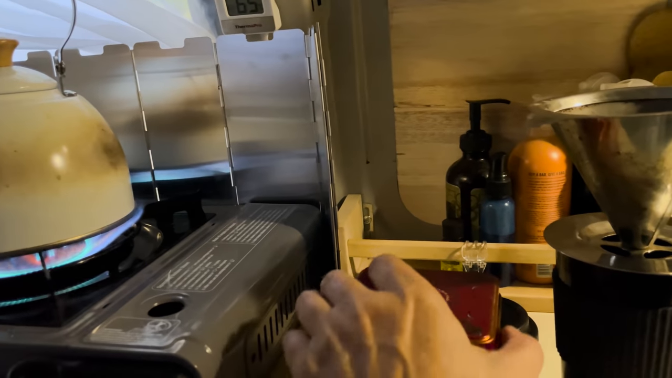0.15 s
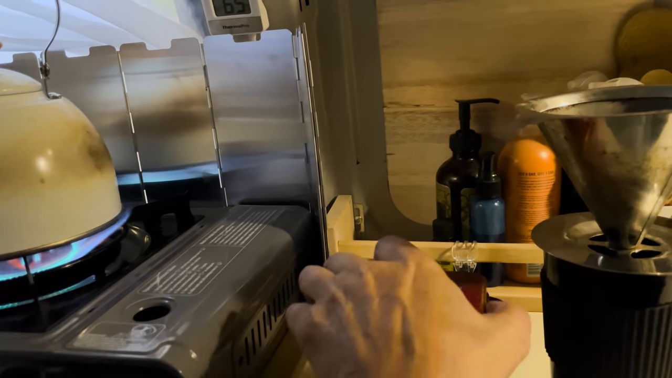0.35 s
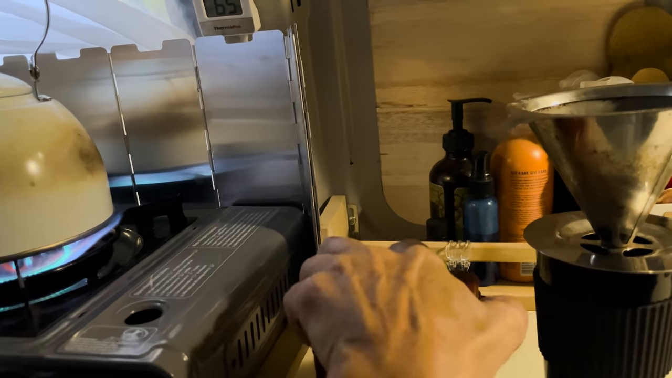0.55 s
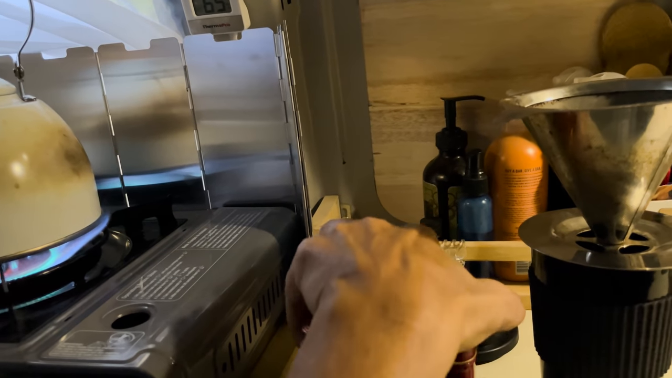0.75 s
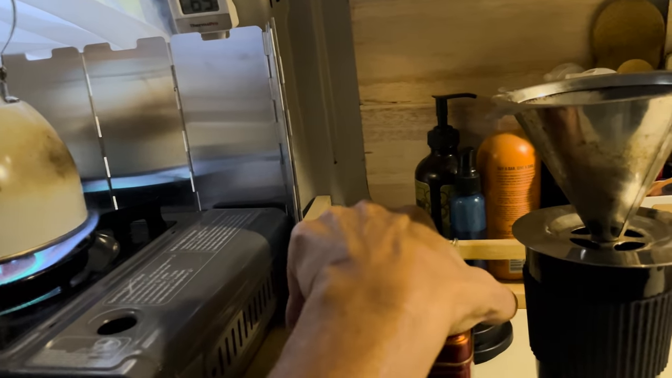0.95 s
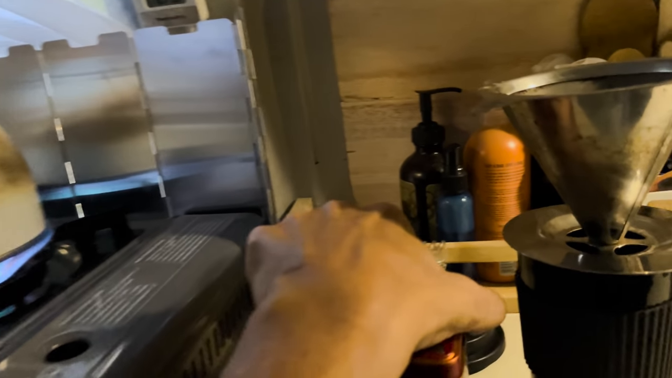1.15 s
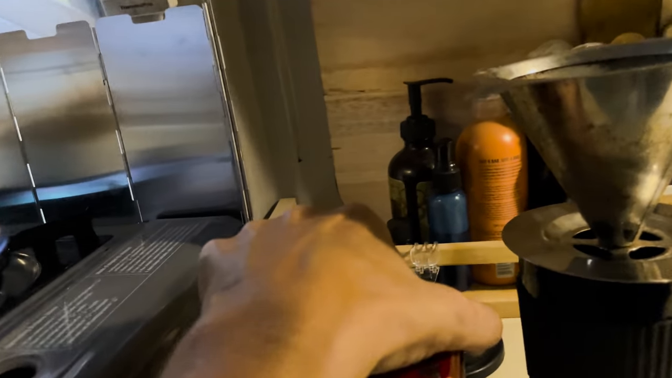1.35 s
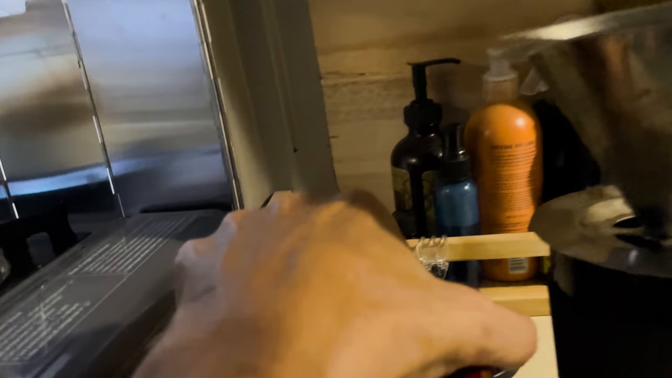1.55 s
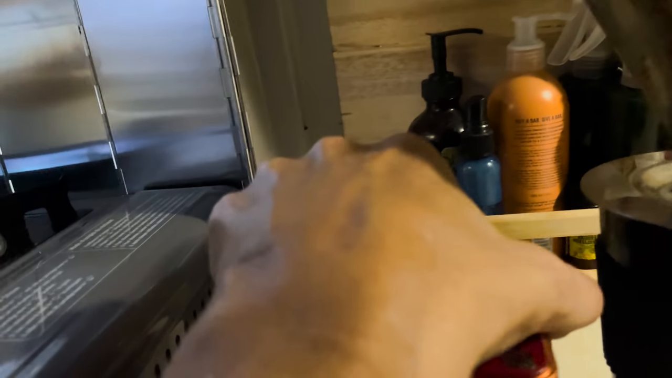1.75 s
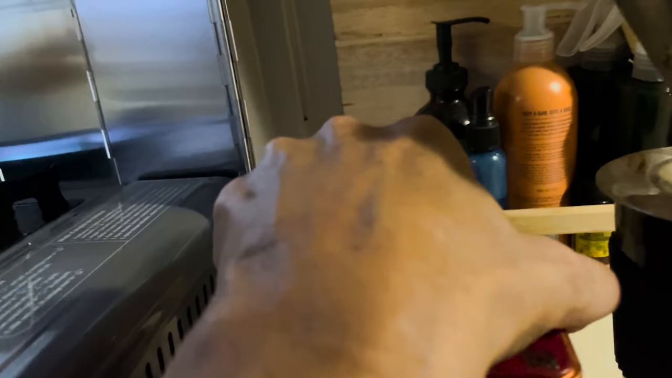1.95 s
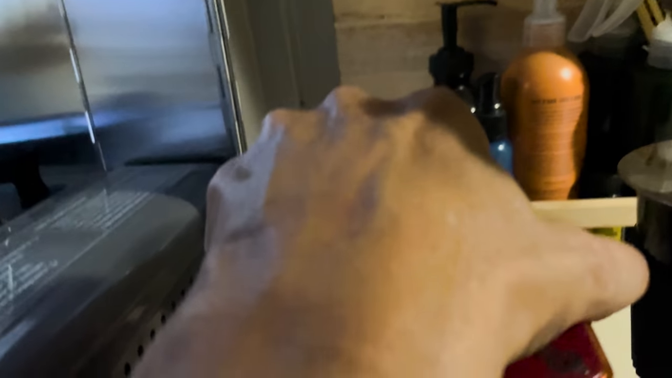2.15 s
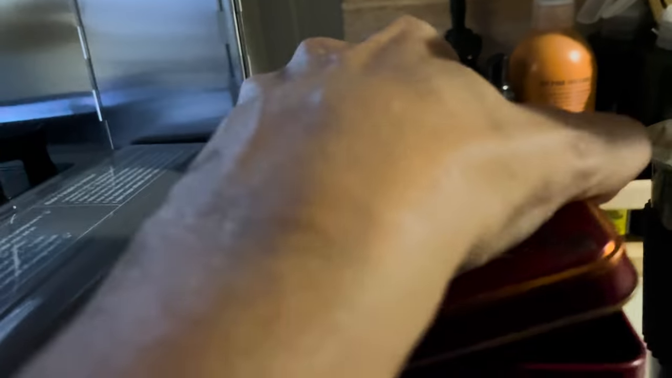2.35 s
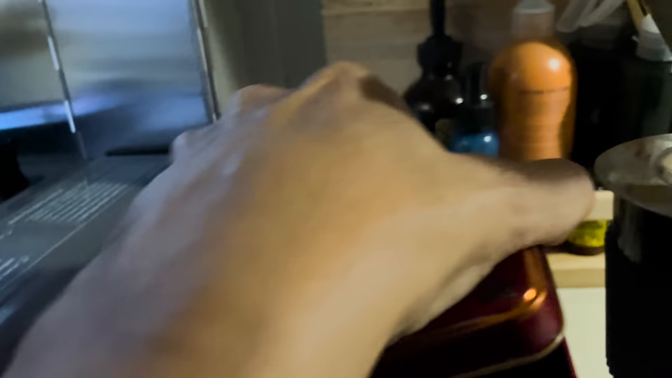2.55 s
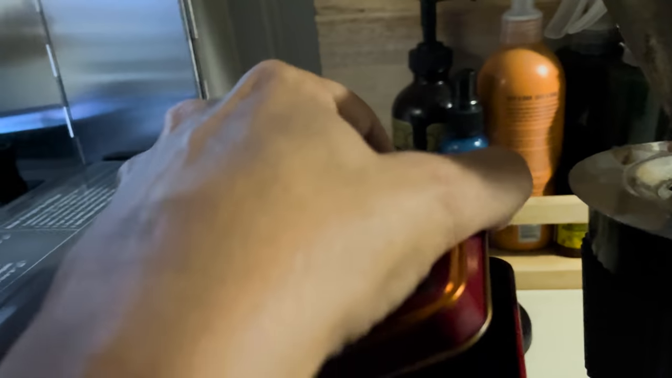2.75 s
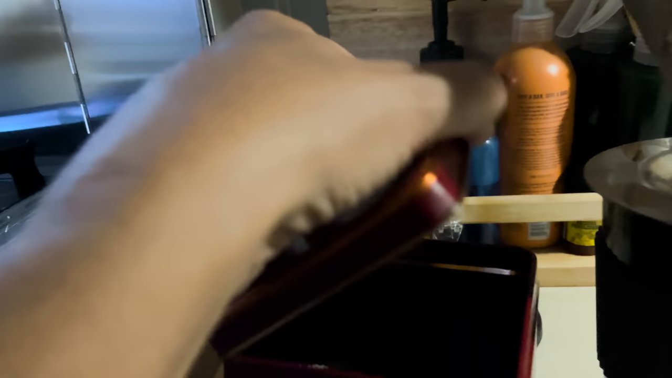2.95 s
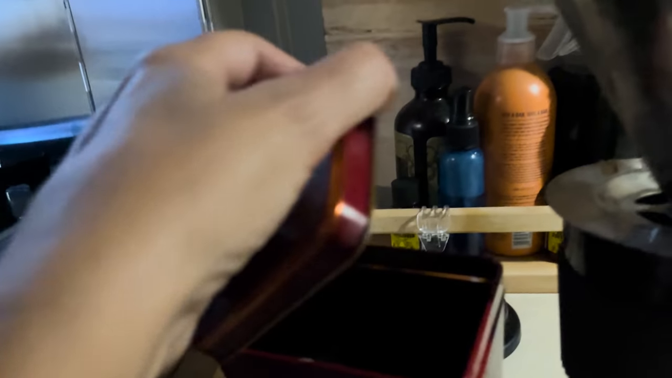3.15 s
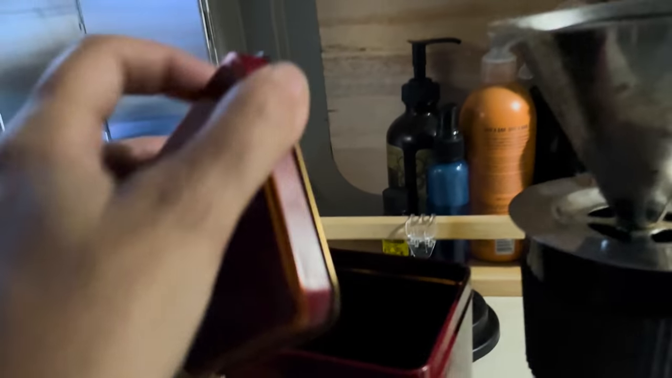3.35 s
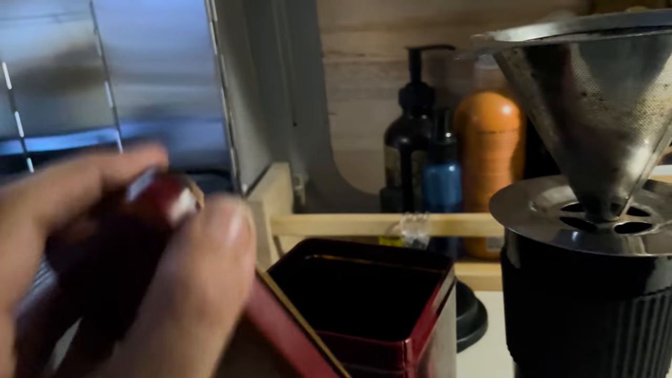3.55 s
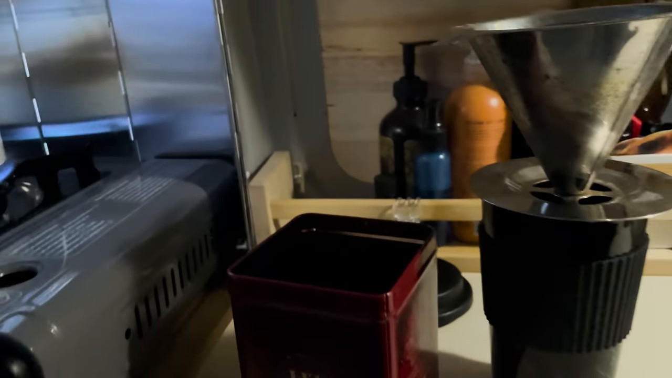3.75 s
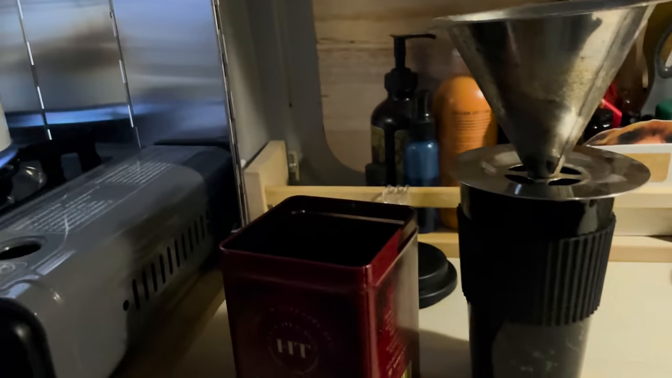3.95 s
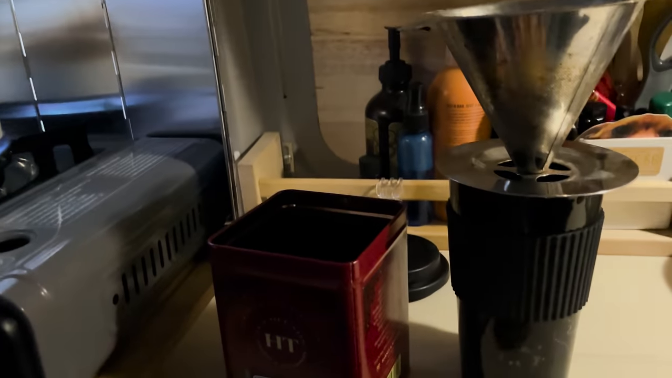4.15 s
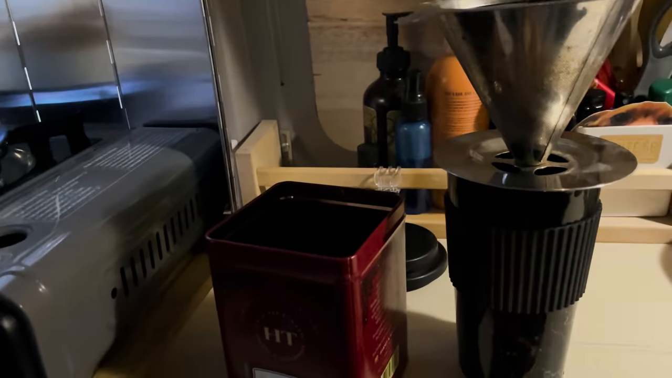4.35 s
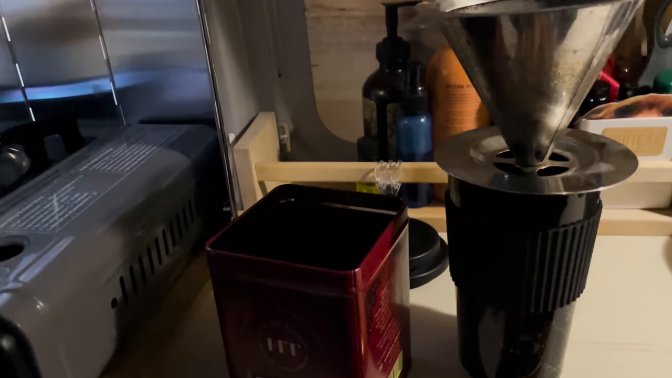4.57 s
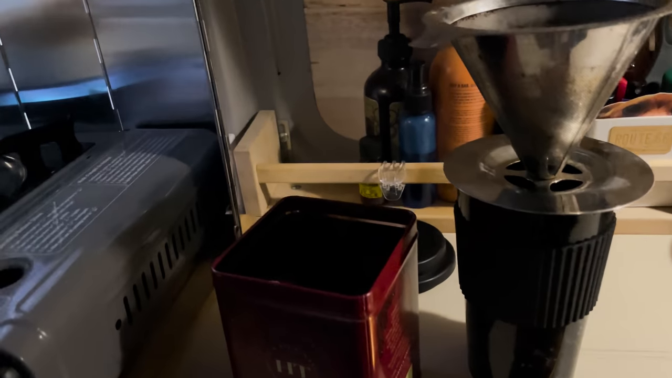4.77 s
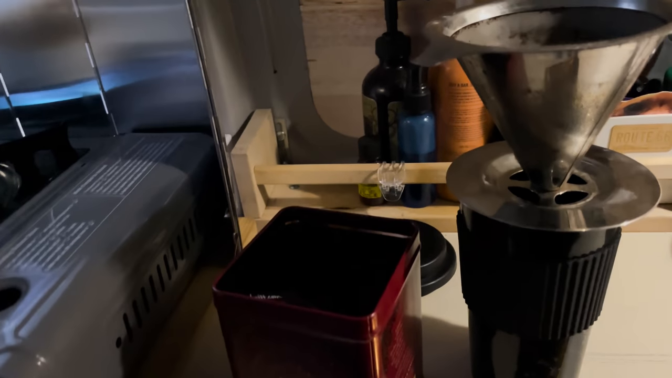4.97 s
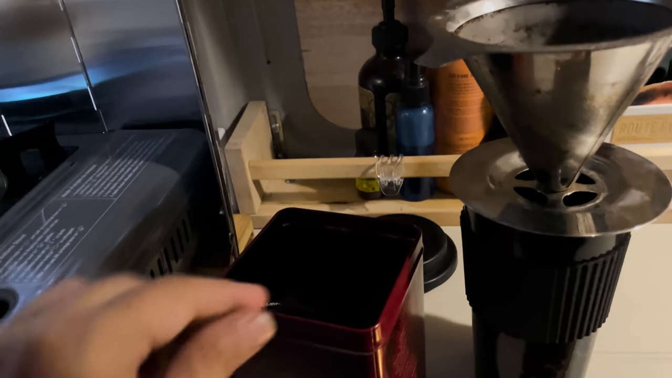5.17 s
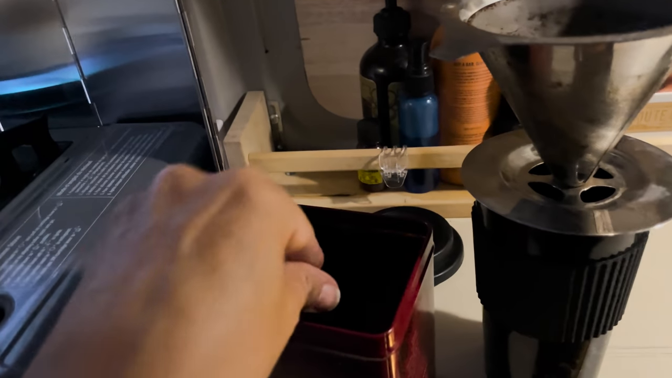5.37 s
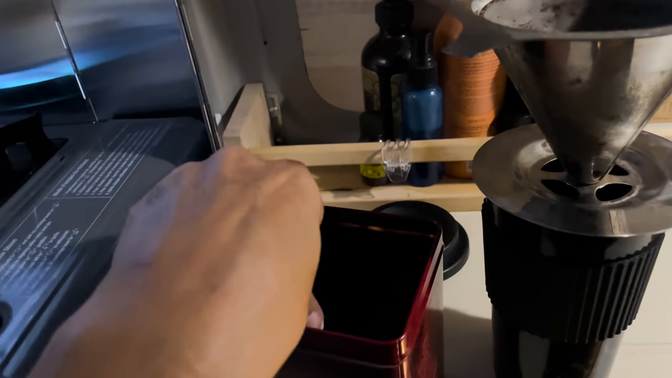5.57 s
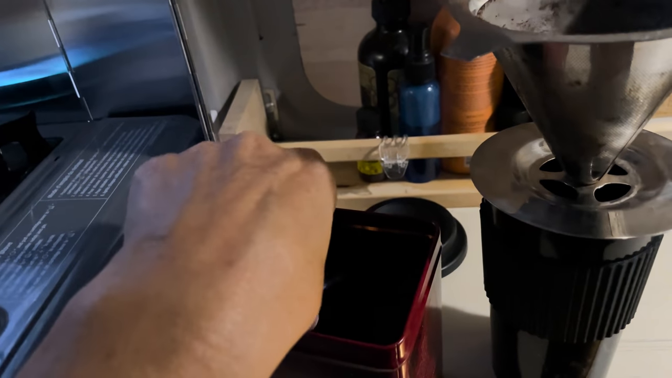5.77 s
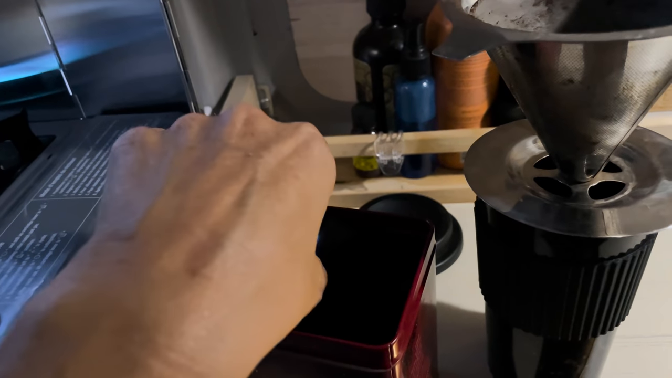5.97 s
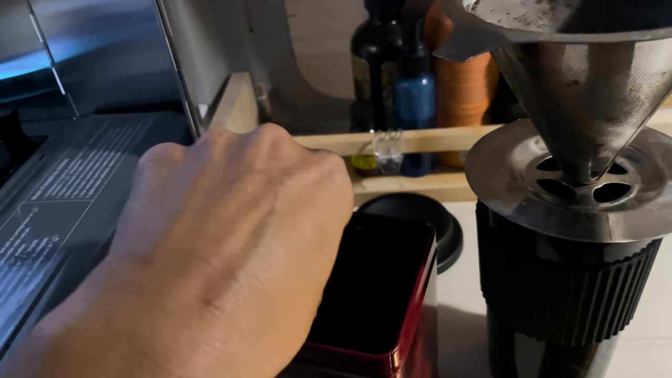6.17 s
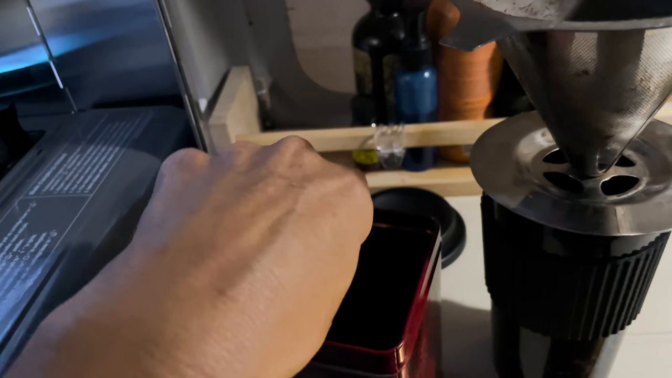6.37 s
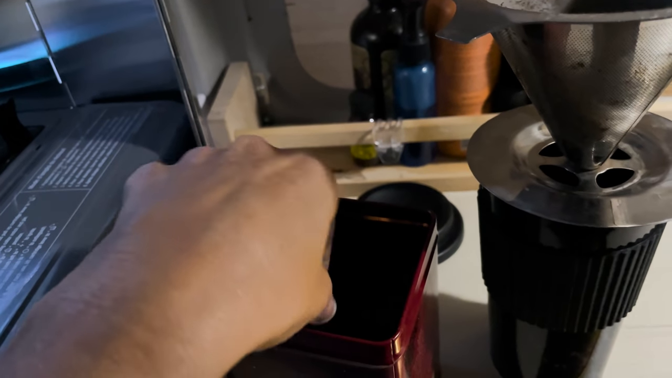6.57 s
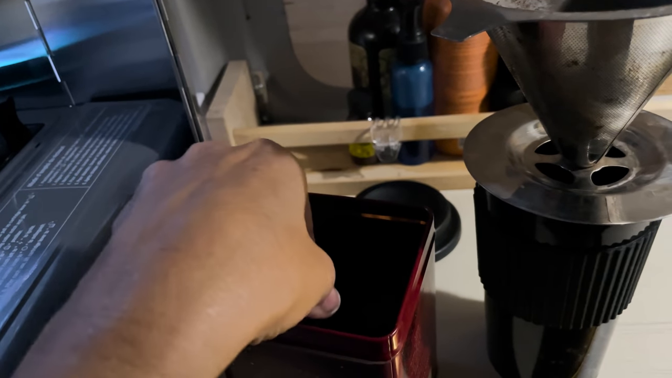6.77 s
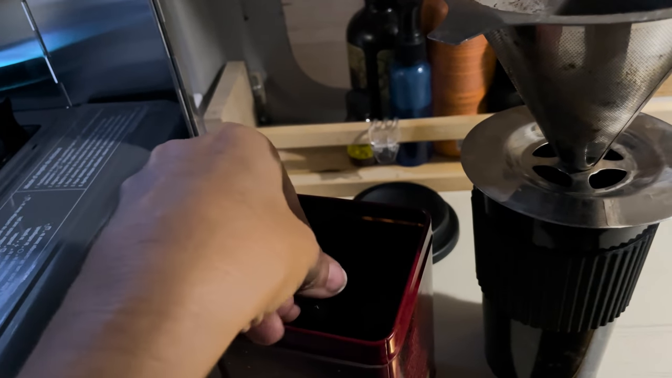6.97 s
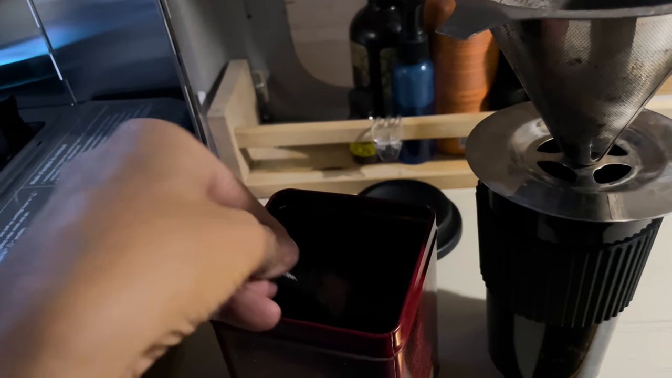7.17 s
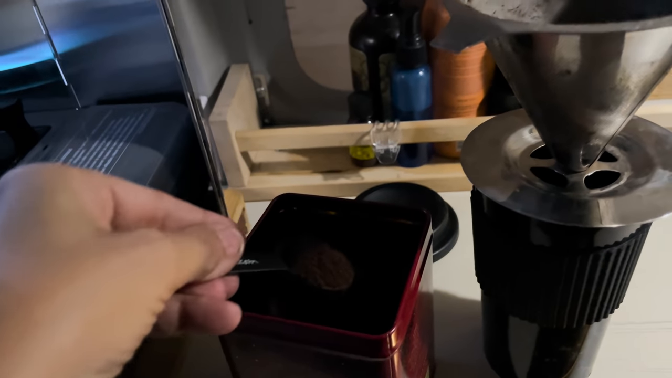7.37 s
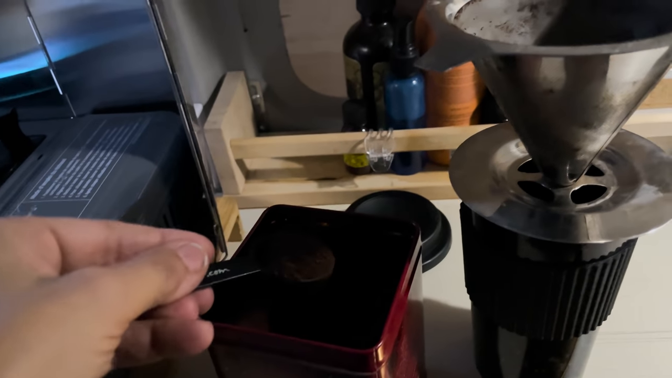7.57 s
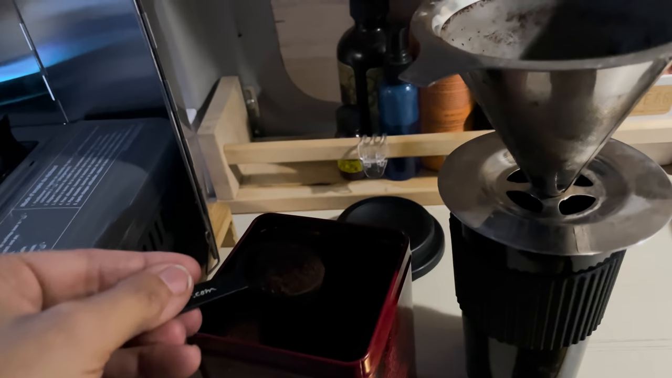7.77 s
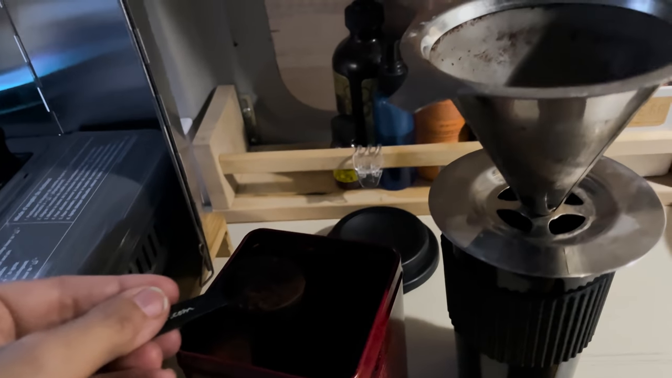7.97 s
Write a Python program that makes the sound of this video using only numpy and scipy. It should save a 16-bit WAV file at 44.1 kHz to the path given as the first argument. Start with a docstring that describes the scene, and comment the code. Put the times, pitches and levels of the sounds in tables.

```python
"""Coffee tin beside a hissing gas ring

Fingers knock and flex a sheet-metal tin, its lid pops off and is set down with a clink, then a scoop digs
in the ground coffee and taps the walls: short noisy pushes set the tin's modes ringing.
A gas ring hisses under a kettle in a small van, left of the microphones: noise shaped by resonances.
A low hum (two sines) and a rumble (low noise) lie below; a few dull echoes follow the handling."""
import sys
import numpy as np
from scipy import signal
from scipy.fft import rfft, irfft, next_fast_len
from scipy.io import wavfile

SR = 44100
rng = np.random.default_rng(int(sys.argv[2]) if len(sys.argv) > 2 else 0)


def pcm_store(signal):
    """Save signal as 16-bit PCM."""
    levels = np.round(np.clip(np.atleast_2d(signal), -1, 1) * 32767)
    wavfile.write(sys.argv[1], SR, levels.astype(np.int16).T)


N = 353461

# modes of the free tin: (frequency [Hz], relative level [dB], time to fall by 60 dB [s])
TIN_MODES = [(151.5, 10, 0.02), (162, -26, 0.045), (280, -15, 0.22), (303.4, 2, 0.14), (329, 7, 0.11),
             (385, -2.5, 0.17), (457, -0.5, 0.062), (560, 5, 0.046), (676, -3, 0.05), (751, -3.5, 0.13),
             (839, 6, 0.041), (930, -1.5, 0.036), (1106, -2, 0.013), (1080, -0.5, 0.066), (1243, -2, 0.05),
             (1520, -2, 0.059), (1632, 2.5, 0.048), (1793, 2, 0.065), (2070, -8.5, 0.06),
             (2480, 8.5, 0.048), (2930, 9.5, 0.023), (3320, 2, 0.066), (3560, -9, 0.038), (3750, -19, 0.06),
             (5020, 18, 0.004), (4770, 3, .015), (6570, 13, 0.0084), (8230, -2, 0.019)]
# middles of the mode regions, low to high: (frequency [Hz])
REGION_MIDDLES = (150, 320, 570, 850, 1500, 3200, 6500)


def from_db(db):
    """Decibels to gain."""
    return 10 ** (np.asarray(db) / 20)


def rms_one(x):
    """Scale to rms 1."""
    return x / np.sqrt(np.mean(x ** 2) + 1e-20)


def in_time(rows, **outside):
    """Columns of a curve table at every sample."""
    s, *columns = np.transpose(rows)
    return [np.interp(np.arange(N) / SR, s, column, **outside) for column in columns]


def in_hz(rows, hz):
    """Columns of a spectrum table at the given frequencies."""
    f, *columns = np.transpose(rows)
    return [np.interp(np.log(hz + 1), np.log(f), column) for column in columns]


def drift(rate_hz):
    """Slow random wander of spread 1: noise at every 40th sample through a double one-pole low-pass."""
    r = np.exp(-80 * np.pi * rate_hz / SR)
    coarse = rng.standard_normal(N // 40 + 2002)
    slow = signal.lfilter([1], [1, -2 * r, r * r], coarse)[2000:]   # the filter has settled by here
    return np.interp(np.arange(N) / 40, np.arange(len(slow)), rms_one(slow))


def cut(x, hz, kind, order=2):
    """Butterworth filter."""
    return signal.sosfilt(signal.butter(order, hz, kind, fs=SR, output="sos"), x)


def ring(push, hz, t60):
    """A mode as a resonator: a unit click sets a sine ringing from height 1, 60 dB down after t60 seconds."""
    r = from_db(-60 / (max(t60, .003) * SR))
    w = 2 * np.pi * hz / SR
    return signal.lfilter([0, np.sin(w)], [1, -2 * r * np.cos(w), r * r], push)


def sides(pan_db):
    """Left and right gains for a left-minus-right level difference."""
    return from_db(np.multiply.outer([.5, -.5], pan_db))


def placed(sound, s):
    """A short sound at its moment."""
    out = np.zeros((2, N + sound.shape[1]))
    at = round(s * SR)
    out[:, at:at + sound.shape[1]] = sound
    return out[:, :N]


def region_levels(push_db, push_hz, tap_db, soft_db):
    """A push stirs the low modes about its pitch, a tap the wall modes and, if hard, those above."""
    hz = np.array(REGION_MIDDLES)
    push_above_db, push_under_db = 8, 16   # loss per octave above and below the pitch
    off = np.log2(hz / push_hz)
    push = push_db - np.where(off > 0, push_above_db * off, -push_under_db * off)

    wall_hz, tap_under_db = 855, 12.5   # centre of the wall modes; loss per octave below it
    tap_bend_db = 1.5   # extra loss per octave squared above it
    octaves = np.log2(hz / wall_hz)
    above = -soft_db * octaves - tap_bend_db * octaves ** 2
    tap = tap_db + np.where(octaves < 0, tap_under_db * octaves, above)
    return np.hypot(from_db(push), from_db(tap))


def tin():
    """Every knock rings the same modes, weighted by where the tin is touched and damped by the grip."""
    # knocks on the tin: (start [s], push that flexes the body, level before filters and pan [dB],
    # its pitch [Hz], tap on the wall, likewise [dB], softness: loss above the wall modes [dB per octave],
    # left minus right [dB], fading time of the contact [ms])
    knocks = [(0.01, -33.5, 355, -41, 20, -2, 1.3), (0.079, -32, 300, -49, 20, -5, 2.4),
              (0.139, -36, 397, -40, 0, 0, 4), (0.194, -30.5, 300, -36, 22, -4, 2),
              (0.319, -27, 230, -32, 4, -5, 4), (0.459, -29, 340, -41, 22, -3, 1.8),
              (0.742, -35.5, 350, -33, 24, 0, 2.4), (0.858, -27.5, 320, -49, 20, -3, 0.88),
              (0.911, -27.5, 330, -28, 26, -2, 2.1), (0.988, -20, 330, -14, 10, -3, 1.86),
              (1.039, -34, 260, -50, 14, -2, 2.5), (1.069, -36, 300, -58, 0, -4, 2),
              (1.249, -27, 340, -37, 22, -1, 1.6), (1.47, -35, 320, -59, 8, -7, 1.4),
              (1.754, -30.5, 300, -47, 0, -5, 1.6), (1.839, -35, 270, -40, 12, -4, 2.6),
              (1.942, -35.5, 380, -43, 2, 1, 3.5), (2.042, -39, 420, -41, 8, 11, 3.4),
              (2.092, -43, 350, -49, 3, 3, 2.8), (2.183, -24.5, 199, -33, 5, -1, 1.9),
              (2.203, -38, 300, -43, 5, -3, 0.76), (2.306, -9, 244, -20, 4, -2.5, 2.4),
              (2.319, -13.5, 497, -31, -1.5, -1, 2.7), (2.331, -36, 190, -35, 0, 1, 1.8),
              (2.407, -24, 380, -16, 11, -3.5, 2.4), (2.456, -22.5, 540, -19, 12, 4, 1.54),
              (2.619, -27, 480, -33, 11, 1, 1.25), (2.763, -22, 370, -12.5, 4, -1, 1.74),
              (2.87, -16.5, 352, -11.5, 3, 3, 1.6), (2.931, -21.5, 428, -31, 12, 0, 1.9),
              (3.213, -34, 220, -34.5, 10, -1, 3.6), (3.309, -62, 400, -35, 5, 4, 0.95),
              (4.216, -29.5, 310, -23.5, -5.5, 0, 5.6), (4.389, -26, 405, -18, 0, -2, 5.3),
              (4.419, -41, 290, -28.5, -6.5, 0, 2.95), (4.496, -53, 350, -34, 4, -3, 3.4),
              (4.52, -26.5, 320, -21, -7.5, 0, 2.35), (5.824, -39.5, 330, -33, 0, 2, 1.6),
              (6.032, -29.5, 353, -30.5, 9, 1, 1.8), (6.19, -43.5, 400, -42, -6, 1, 1.9),
              (6.223, -30, 230, -35, -3, -2, 3.7), (6.384, -34.5, 310, -35, -1, -3, 1.04),
              (6.501, -34, 310, -38.5, 1, -2, 3.5), (6.633, -31, 397, -33, 17, 4, .83),
              (6.785, -32.5, 310, -33.5, 1, 0, 3.2), (6.945, -39.5, 310, -41, 14, 4, 2.3),
              (7.169, -39, 249.6, -39, 4, 0, 3)]
    # limits between the mode regions: (frequency [Hz])
    region_limits = (220, 450, 700, 1000, 2300, 4500)
    grip = 0.75   # share of the free ring time left by the hand
    region = np.searchsorted(region_limits, np.array(TIN_MODES)[:, 0])
    out = np.zeros((2, N))
    steps = np.arange(int(.25 * SR))
    for s, *touch, pan_db, ms in knocks:
        swell = steps / SR * 1000 / max(ms, .2)
        # tiny slips of the contact
        slips = rng.standard_normal((9, len(steps))) * swell ** 0.49 * np.exp(-swell)
        luck = rng.standard_normal((len(TIN_MODES), 2))
        parts = np.zeros((len(REGION_MIDDLES), 2, len(steps)))
        for k, ((hz, db, t60), (level_luck, lag_luck)) in enumerate(zip(TIN_MODES, luck)):
            tone = ring(slips[k % 4], hz, t60 * grip)
            tone = tone / np.abs(tone).max() * from_db(db + 0.79 * level_luck)
            late = 1.6 * SR / hz   # long bending waves travel slower: low modes start later
            # each mode radiates in its own direction, so it reaches the two sides at different moments
            lag = np.clip(0.24 * lag_luck * SR / max(hz, 600.), -60, 60) / 2
            parts[region[k]] += [np.interp(steps - late - way * lag, steps, tone, left=0) for way in (1, -1)]
        # the highest modes are too dense to tell apart: a scratch and a bright crack of noise
        parts[-3] += cut(slips[4], [1000, 2300], "band") * from_db(12.0)
        parts[-2] += cut(slips[5] + 2.2 * slips[7:], [2300, 4500], "band") * from_db(16.5)
        parts[-1] += cut(slips[6] + .6 * slips[7:], 2700, "high") * from_db(10)
        peaks = np.abs(parts.mean(1)).max(1)
        blow = np.tensordot(region_levels(*touch) / peaks, parts, 1)
        out += placed(blow * sides(pan_db)[:, None], s)
    return out


def clink():
    """A hard short contact on thicker metal; close mode pairs beat, until the hand damps them."""
    # the lid meets a harder metal edge: (start [s], level [dB])
    contacts = [(4.2169, -18)]
    # what rings: (frequency [Hz], relative level [dB], free time to fall by 60 dB [s], left minus right [dB])
    lid_modes = [(2260, -10, 0.2, -6), (2305, 1, 0.44, 1), (2680, -14, .1, 3), (3730, -5, 0.064, -9),
                 (3128, -9, 0.4, -4), (3052, -14, .2, 3), (4020, -12, 0.11, 13), (4370, -8.5, 0.18, 1),
                 (4970, -13, .08, 0)]
    # the hand closes on the lid: moment after the contact, quick drop, added 60 dB fall time
    caught_s, caught_db, caught_t60_s = 0.038, -4.5, 0.37
    t = np.arange(int(.4 * SR)) / SR
    push = np.exp(-t / .00007)
    sound = np.zeros((2, len(t)))
    for hz, db, t60, pan_db in lid_modes:
        tone = ring(push, hz, t60)
        sound += np.outer(sides(pan_db), from_db(db) * tone / tone.max())
    after = np.maximum(t - caught_s, 0)
    sound = sound * from_db(caught_db * np.minimum(after / .005, 1) - 60 * after / caught_t60_s)
    return sum(placed(from_db(db) * sound, s) for s, db in contacts)


def slide():
    """Uneven stick-slip clicks keep the lower modes of the tin stirring."""
    # fingers and scoop slide on the tin: (start [s], length [s], first level [dB], last level [dB])
    strokes = [(2.097, 0.75, -47, -46.5), (2.884, 0.39, -38, -70), (4.39, 0.14, -29, -55),
               (5.6, 1.7, -62, -63)]
    sizes = rng.standard_normal((2, N)) * from_db(2.5 * np.minimum(rng.exponential(1, N), 4))
    clicks = sizes * (rng.random(N) < 1200. / SR) + 1e-18   # about 1200 clicks a second
    rings = np.zeros(N)
    for k, (hz, db, t60) in enumerate(TIN_MODES):
        if hz < 1700:
            rings += from_db(db) * ring(clicks[k % 2], hz, 0.5 * t60)
    level = np.zeros(N)
    for s, length, first_db, last_db in strokes:
        line = [(s, first_db), (s + length, last_db)]
        level += from_db(in_time(line, left=-120, right=-120)[0])
    return level * rms_one(cut(rings, 265, "high")) * np.ones((2, 1))


def rustle():
    """Skin and coffee grounds rub in short brushes: dense fine grains, heard only high in the treble."""
    # brushes: (time of the peak [s], level [dB], length [s])
    brushes = [(.775, -56, .09), (2.313, -43.5, 0.072), (2.448, -49, .05), (2.61, -54, .06),
               (2.76, -60, .04), (2.87, -51, .04), (2.946, -48, 0.09), (3.398, -54, .08), (5.646, -58, .1),
               (5.81, -51, .07), (5.916, -59, .03), (6.03, -52, .04), (6.187, -48.5, 0.091),
               (6.327, -50, .1), (6.452, -52, .06), (6.55, -53, .14)]
    fall_db, rise_share = 23, 0.42   # fall over one length; the rise takes this share of that time
    grains = rng.standard_normal(N) * from_db(3.2 * np.minimum(rng.exponential(1, N), 5))
    t = np.arange(N) / SR
    level = np.zeros(N)
    for s, db, length in brushes:
        away = np.maximum(t - s, (s - t) / rise_share)
        level += from_db(db - fall_db * away / length)
    return level * rms_one(cut(cut(grains, 12200, "high", order=3), 15500, "low"))


def van(x):
    """Walls close by send back dull echoes that weaken with delay, different ones on each side."""
    out = np.zeros((2, N))
    dull = cut(x.mean(0), 6300, "low")
    for k, s in enumerate(rng.uniform(.004, .06, 40)):
        lag = int(s * SR)
        out[k % 2, lag:] += dull[:-lag] * from_db(-60 * s / 0.15) * (-1) ** (k // 2)
    return out


def gas_jet():
    """Turbulent noise through burner resonances; the two microphones share part of it, shifted in phase."""
    # jet before the resonances: (frequency [Hz], left level [dB per Hz], right level [dB per Hz],
    # likeness of the sides [0-1], lead of the left [radians])
    jet_spectrum = [(150, -76, -78, .8, .2), (400, -83, -84, .6, 2.4), (700, -85, -89, .4, 1.6),
                    (1100, -73, -78, .8, 2.7), (1850, -70, -73, .8, 3.4), (2500, -74, -77, .5, 4.5),
                    (3100, -81, -87, .25, 6.2), (4500, -82, -90, .25, 6.2), (6500, -79, -87, .35, 4.4),
                    (8000, -83, -86, .5, 3.7), (9400, -88, -88, .9, 3.1), (11000, -95, -95, .55, 2.3),
                    (12400, -98, -98, 1, 0), (15500, -98, -98, 1, 0)]
    # resonances and notches of burner, kettle base and wind shield: (frequency [Hz], width [Hz], height [dB])
    resonances = [(835, 36, 9.5), (936, 46, -2), (994, 20, 12.5), (1145, 29, -0.5), (1485, 100, -3),
                  (1577, 46, 5), (1765, 18, 11.5), (1925, 71, 9), (2010, 89, -1), (2277, 48, 7),
                  (2707, 28, 9.5), (2775, 16, 8), (3390, 90, -6), (3880, 122, 9.5), (3926, 360, -7),
                  (4565, 24, 10), (5175, 135, 5.5), (5626, 320, -10.5), (5965, 60, 6.5), (6430, 66, 4.5),
                  (6930, 135, 5), (7320, 220, -4.5), (7700, 370, 2), (9500, 290, -5.5), (9850, 360, 7),
                  (14100, 820, 2), (15100, 230, -7)]
    # the microphones move about the stove:
    # (time [s], change of the jet body [dB], change of its part common to both sides [dB])
    stance = [(0, -0.5, -1.5), (1.1, -1, 0), (1.7, 0.65, 1), (3, -0.45, 0), (8, -0.5, 1)]
    # upper edges of the bands of the jet body; treble lies above: (frequency [Hz])
    band_edges = (600, 1300, 1650, 1850, 2100, 2500, 3100)
    size = next_fast_len(N)
    hz = np.arange(size // 2 + 1) * SR / size
    left_db, right_db, alike, lead = in_hz(jet_spectrum, hz)
    alike = np.clip(alike, 0, 1)

    colour_db = sum(db / (1 + (2 * (hz - f) / width) ** 2) for f, width, db in resonances)
    colour = from_db(colour_db) * np.sqrt(SR / 2)   # the root turns level per Hz into noise level
    colour = colour * hz ** 2 / (hz ** 2 + 60. ** 2)
    colour = colour / (1 + (hz / 15600) ** 120)   # the hiss ends here

    shared, own = rfft(rng.standard_normal((2, size)))
    left = from_db(left_db) * shared * np.exp(1j * lead)
    right = from_db(right_db) * (alike * shared + np.sqrt(1 - alike ** 2) * own)
    pair = np.array([left, right]) * colour
    band = np.searchsorted(band_edges, hz)
    *bands, treble = (irfft(pair * (band == k), size)[:, :N] for k in range(len(band_edges) + 1))
    # each band wanders on its own
    body = sum(part * from_db(1.57 * drift(0.36) + 0.87 * drift(12.4)) for part in bands)
    body_db, common_db = in_time(stance)
    body = body + (from_db(common_db) - 1) * body.mean(0)
    flicker = 0.18 * drift(6.9)   # the flame wavers, in dB
    both = body * from_db(body_db + flicker) + treble * from_db(0.37 + .6 * flicker)
    return sides(0.83)[:, None] * both


def rumble():
    """Low lumpy noise, nearly alike on both sides, and a hum: a sine of gliding pitch with its octave."""
    # shape of the rumble: (frequency [Hz], relative level [dB per Hz])
    rumble_spectrum = [(12, -31), (20, -3), (46, 9), (70, 5.5), (87, -1), (114, -7), (152, -9.5),
                       (193, -32), (260, -11.5), (340, -16.5), (570, -120)]
    # rumble before its wander and dips: (time [s], level [dB])
    rumble_course = [(0, -42), (2.2, -40.5), (3.3, -43.5), (5, -42), (6.2, -45.5), (8, -45.5)]
    # hum before its waver, dips and pan, nearly silent ahead of the first row:
    # (time [s], pitch [Hz], level [dB])
    hum_course = [(2.3, 75.5, -57), (2.46, 72.7, -42), (3.0, 70.8, -46), (3.7, 70.04, -46),
                  (4.1, 70.56, -42.5), (4.6, 70.7, -46), (5.6, 71, -47.5), (5.95, 69.46, -50),
                  (6.8, 69.2, -40.5), (8.0, 68, -45)]
    # hum and rumble dip briefly: (middle [s], half length [s])
    low_gaps = [(3.818, 0.091), (4.244, 0.044), (6.79, 0.021)]
    hum_gap_db, rumble_gap_db, hum_waver_db = -19, -7, 1.5
    size = next_fast_len(N)
    hz = np.arange(size // 2 + 1) * SR / size
    shape = from_db(in_hz(rumble_spectrum, hz)[0])
    mid, side = irfft(rfft(rng.standard_normal((2, size))) * shape, size)[:, :N]
    noise = rms_one(mid + from_db(-11) * side * [[1], [-1]])
    noise = noise * from_db(in_time(rumble_course)[0] + 2.3 * drift(2.6))

    gaps = sum(np.exp(-((np.arange(N) / SR - s) / half) ** 2) for s, half in low_gaps)
    phase = 2 * np.pi * np.cumsum(in_time(hum_course)[0]) / SR
    hum_db = in_time(hum_course, left=-99)[1] + hum_gap_db * gaps + hum_waver_db * drift(3.8)
    hum = np.sqrt(2) * from_db(hum_db) * (np.sin(phase) + from_db(-19.0) * np.sin(2 * phase))
    return noise * from_db(rumble_gap_db * gaps) + hum * sides(-1.5)[:, None]


def scene():
    """Handling of the tin with its echoes and rustle, over the stove and the low rumble."""
    handling = cut(tin() + clink() + slide(), 118, "high", order=4)   # a small tin radiates no deep bass
    return handling + from_db(-15) * van(handling) + rustle() + gas_jet() + rumble()


def record(dry):
    """No deepest bass; the highest treble is nearly common to both channels; the top is cut steeply."""
    mono_above_hz, cutoff_hz = 12100, 16300
    mid, side = (dry[0] + dry[1]) / 2, (dry[0] - dry[1]) / 2
    size = next_fast_len(N)
    hz = np.arange(size // 2 + 1) * SR / size
    spectrum = rfft(side, size)
    side = irfft(spectrum * (hz < mono_above_hz) + from_db(-33.0) * spectrum, size)[:N]
    both = cut(np.array([mid + side, mid - side]), 67.5, "high")
    return signal.sosfilt(signal.cheby2(14, 60, cutoff_hz, fs=SR, output="sos"), both)


dry = scene()
out = record(dry)
pcm_store(out)
```